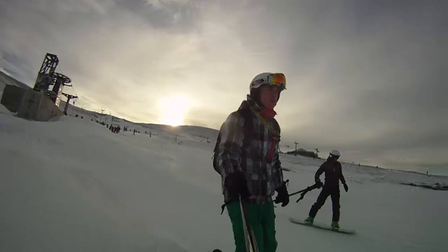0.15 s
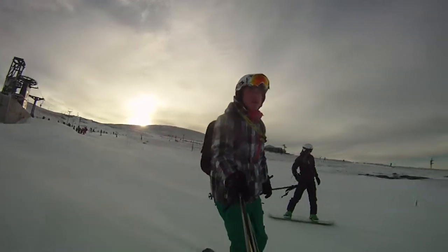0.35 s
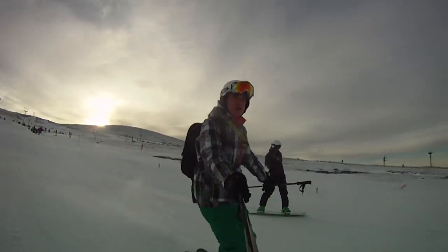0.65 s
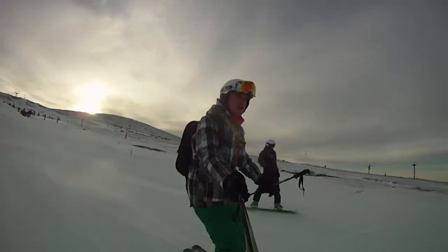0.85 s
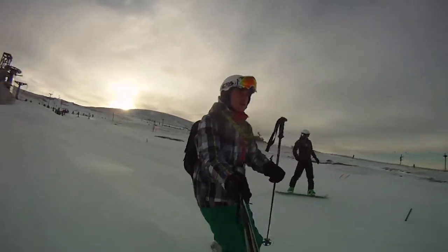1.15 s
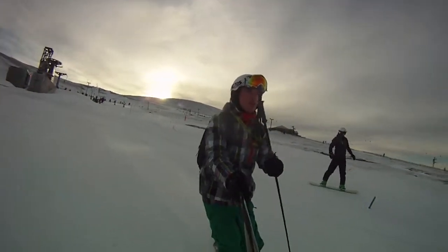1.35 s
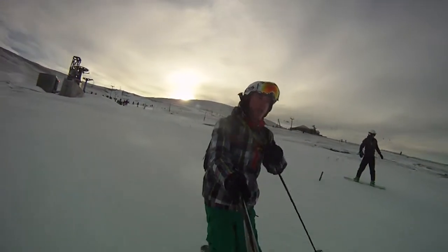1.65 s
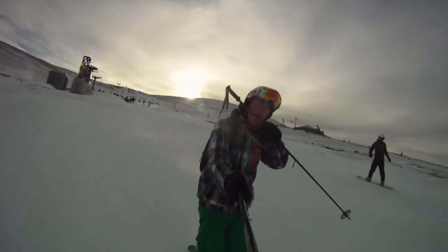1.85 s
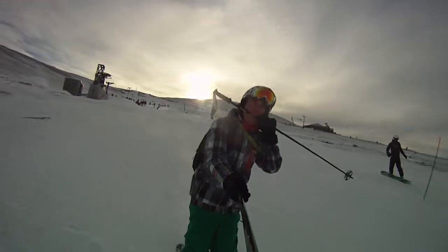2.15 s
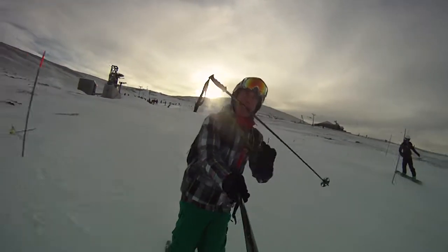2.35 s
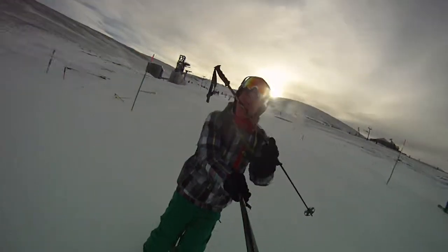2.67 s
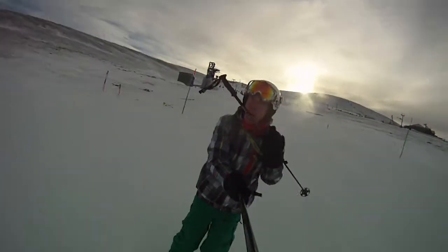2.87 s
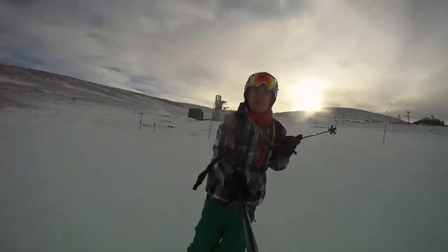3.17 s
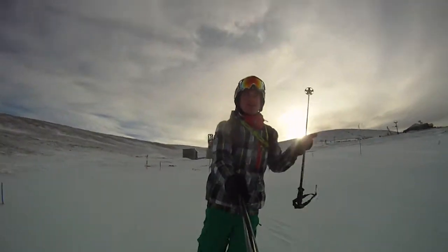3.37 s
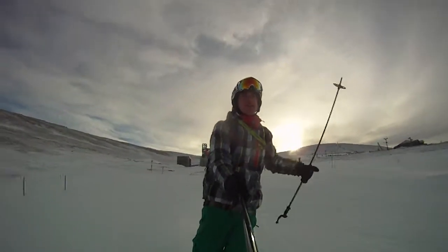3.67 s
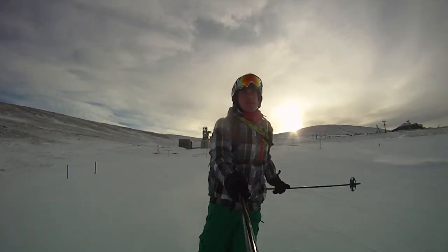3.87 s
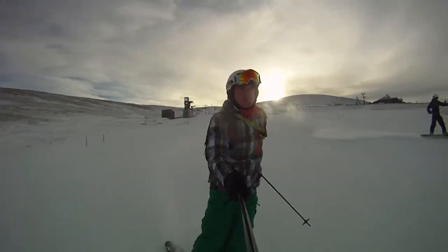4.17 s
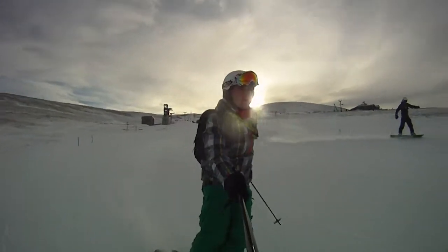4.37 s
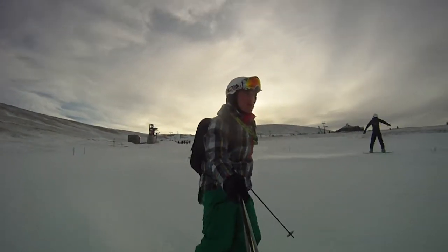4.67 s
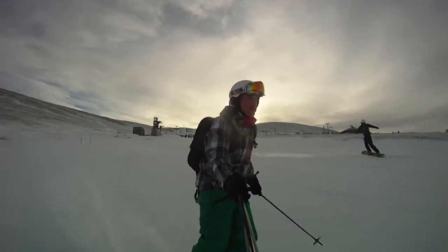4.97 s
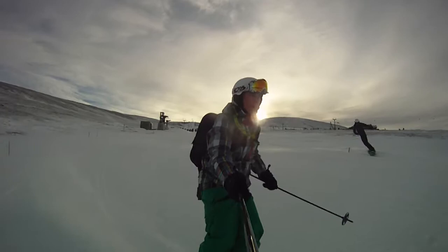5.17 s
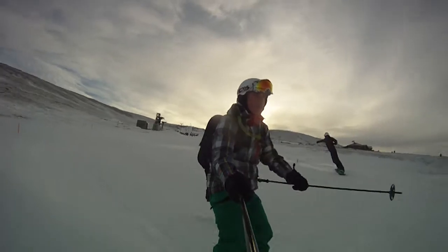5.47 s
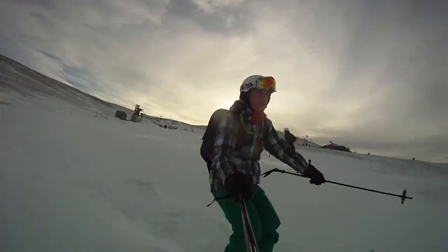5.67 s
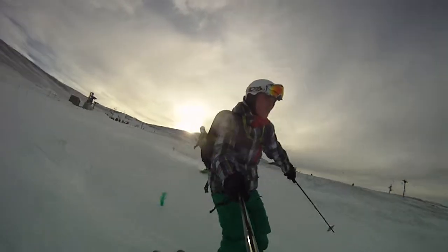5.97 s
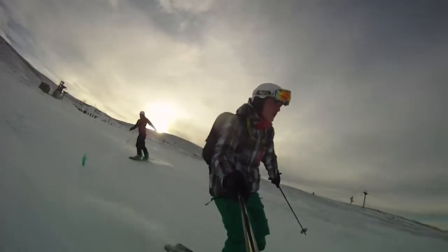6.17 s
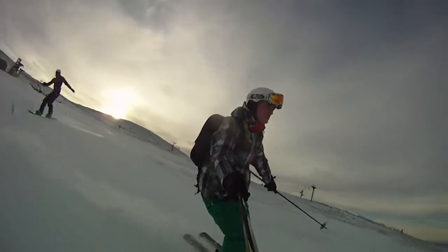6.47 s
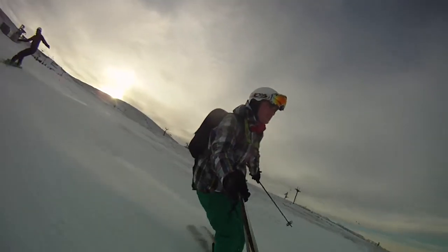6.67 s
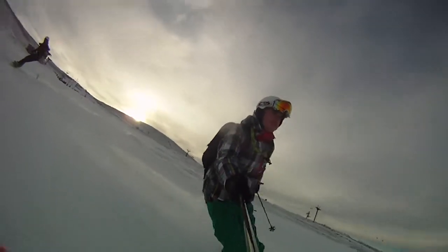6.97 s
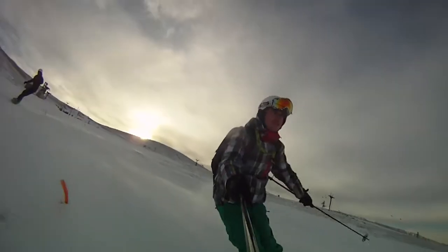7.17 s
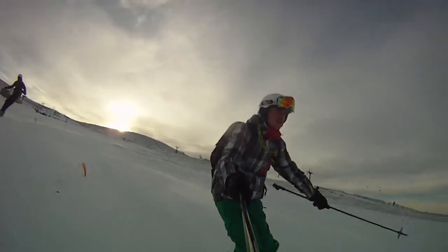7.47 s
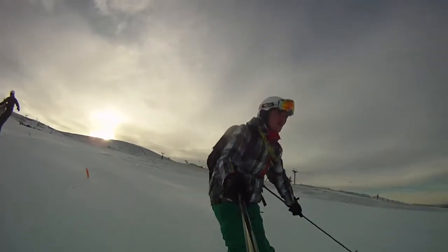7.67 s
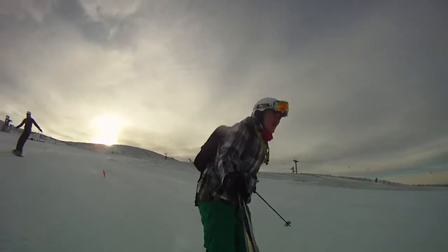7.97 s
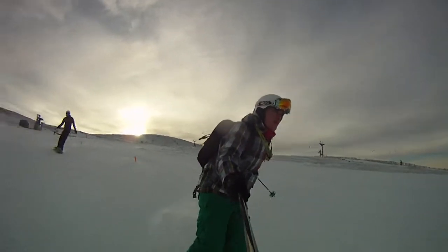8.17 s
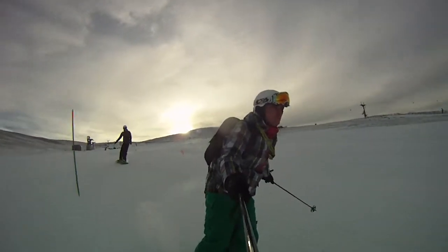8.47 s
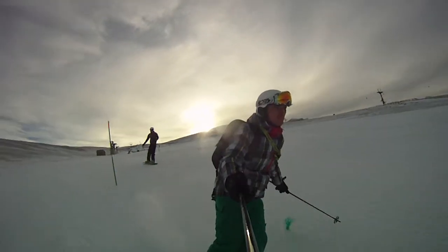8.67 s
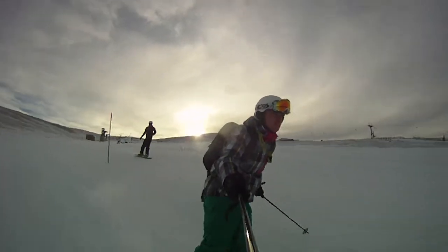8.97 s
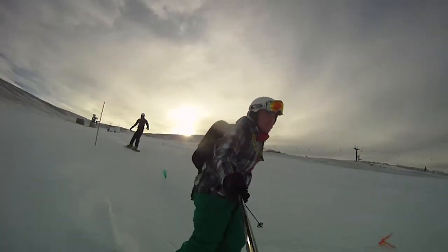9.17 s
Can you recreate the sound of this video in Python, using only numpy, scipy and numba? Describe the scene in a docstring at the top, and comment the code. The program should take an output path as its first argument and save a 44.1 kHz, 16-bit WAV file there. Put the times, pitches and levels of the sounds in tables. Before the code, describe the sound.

Outdoors on an open ski slope, heard from inside a closed camera case on a hand-held pole: boxy, close, dry, with gritty mirrored treble. From 0 s low wind throbs and hums over a thin, crunchy hiss of skis on packed snow. A click at 0.6 s leads to short rubbery creaks around 0.7-0.9 s, a deep thump and knocks near 1.1 s, then a quieter lull about 2 s. Thumps return around 2.5 s, with creaks and hollow wind hums at 3-3.4 s. The skis scrape harder at 4.3 s with sharp ticks. From 5 to 6.5 s the wind tone climbs and wavers loudly, with frequent chips clicking, then falls back. A scrape rises at 7.4 s, eases by 8 s, then the loudest grinding carve swells at 8.4-8.8 s and drops away, leaving a soft hiss, a faint creak and low wind until about 9.3 s.

```python
"""A skier glides and carves down packed snow, holding a camera in a closed housing on a pole.
From the start, snow grains under the skis ring the housing, and wind sheds tonal eddies, buffets and hums.
Chips and pole knocks tick from 0.6 s, stick-slip creaks the grip from 0.7 s, and gusts and knocks
give low thumps from 1.1 s. The eddy tone is highest from 5 to 6.5 s; the skis are loudest near 8.7 s.
Throughout, the recorder samples slowly and holds each value, which mirrors the sound into the treble."""
import sys
import numpy as np
from scipy import signal
from scipy.io import wavfile
from scipy.ndimage import uniform_filter1d
from numba import njit

SR = 44100
rng = np.random.default_rng(int(sys.argv[2]) if len(sys.argv) > 2 else 0)


def unload_audio(sound):
    """Save the sound as a 16-bit wav file, at the path given as the first command line argument."""
    columns = np.transpose(np.atleast_2d(sound))
    # keep every value between -1 and 1, then stretch to whole-number steps
    steps = np.round(np.clip(columns, -1, 1) * 32767)
    wavfile.write(sys.argv[1], SR, steps.astype(np.int16))


N = 411453  # samples


def undb(db):
    """Level definition: amplitude ratio = 10^(dB/20)."""
    return 10 ** (np.asarray(db) / 20)


def unit(x):
    """Normalisation to an RMS of 1."""
    return x / np.sqrt(np.mean(x ** 2))


def curves(table):
    """Linear interpolation in time of each column of a table."""
    s, *columns = np.transpose(table)
    return [np.interp(np.arange(N) / SR, s, c) for c in columns]


@njit
def svf(x, hz, width):
    """State-variable band-pass: a resonance with a moving centre, gain 1 at the centre."""
    y, band_state, low_state = np.empty(len(x)), 0., 0.
    for i in range(len(x)):
        g = np.tan(np.pi * hz[i] / SR)
        k = width[i] / hz[i]
        v = (band_state + g * (x[i] - low_state)) / (1 + g * (g + k))
        band_state = 2 * v - band_state
        low_state += 2 * g * v
        y[i] = k * v
    return y


def band(x, hz, width, skirt=1.84):
    """Cascaded resonance: two peaks of widths width and skirt * width, gain 1 at the centre."""
    peaks = [signal.iirpeak(hz, hz / w, fs=SR) for w in (width, skirt * width)]
    return signal.sosfilt([np.concatenate(peak) for peak in peaks], x)


def walk(rate):
    """Random modulation: normal levels joined by straight lines, rate of them a second."""
    steps = np.arange(N) * rate / SR
    levels = rng.standard_normal(int(2 * steps[-1]) + 9)
    return np.interp(steps, np.arange(len(levels)), levels)


def grains(rate, spread_db):
    """Shot noise: random clicks, rate a second on average, of scattered size."""
    size = rng.standard_normal(N) * undb(spread_db * rng.standard_normal(N))
    return unit(size * (rng.random(N) < rate / SR))


def swells(table, rise_s, fall_s):
    """Asymmetric Gaussian modulation: bell-shaped changes in dB with separate rise and fall times."""
    t = np.arange(N) / SR
    return sum(db * np.exp(-((t - s) / np.where(t < s, rise_s, fall_s)) ** 2) for s, db in table)


def blows(table, cycles, crack, crack_hz):
    """Impact response: a tone that dies within a few cycles, with a burst of noise around crack_hz."""
    tone, burst = np.zeros(N), np.zeros(N)
    for s, db, hz in table:
        turns = np.arange(int(6 * cycles * SR / hz)) * hz / SR
        push = undb(db) * (turns / cycles) * np.exp(1 - turns / cycles)
        i = int(s * SR)
        tone[i:i + len(turns)] += push * np.sin(2 * np.pi * turns)
        burst[i:i + len(turns)] += push
    noise = unit(band(rng.standard_normal(N), crack_hz, 0.84 * crack_hz))
    return tone + crack * burst * noise


# glide of the skis: [t/s, level/dB before the mode gains]
GLIDE = [(0, -48), (.4, -48.5), (.68, -48.5), (1.06, -44), (1.3, -50), (2.0, -52), (2.39, -49),
         (2.7, -51.5), (3.12, -52.5), (3.43, -46), (3.59, -45), (3.92, -44.5), (4.1, -41.5), (4.3, -36.5),
         (4.62, -43), (4.73, -40), (5.1, -38.5), (5.35, -37), (5.75, -50), (5.86, -44.5), (6.08, -47.5),
         (6.45, -43), (6.86, -43), (7.02, -46), (7.3, -44), (7.43, -38), (7.74, -44.5), (8.08, -50),
         (8.2, -40), (8.4, -32), (8.68, -29.5), (8.9, -35.5), (8.94, -44.5), (9.2, -45), (9.33, -49)]
# spectral colour of the skis: [t/s, then five gains/dB: 1 near 1.1 kHz, 2 near 1.3 and 2.9 kHz,
# 3 near 3.6 kHz, 4 above 4 kHz, 5 under 1 kHz and near 1.6 kHz]
SKI_COLOUR = [(0, -6.5, -4, -4.5, -1, -14.5), (.45, -6.5, -5, -1.5, 0, -13), (1.0, -7, -7, -7, -5, -10.5),
              (1.45, -1.5, -5, -2, -2.5, -10), (1.9, -7.5, -5, -3, -3.5, -16),
              (2.35, -4.5, -8, -1.5, -6.5, -15), (2.75, -2.5, 1, -1, -3.5, -11),
              (3.1, -4.5, -6, -4, -4, -13), (3.55, -6, -4.5, -1.5, -4.5, -20.5), (4.02, 0, -4, -4, -6, -14),
              (4.35, -8, -4, -5, -7.5, -19), (4.65, -8.5, -2, -4.5, -5, -19), (4.95, -5.5, -1, -3, -3, -18),
              (5.3, -6.5, -4, -4, -6.5, -20.5), (5.75, -7, -3, -5, -4.5, -13), (6.0, -9, -5, -5, -4.5, -15),
              (6.32, -9, -4, -5, -3, -13), (6.5, -3, -3, -2.5, 2, -9.5), (6.9, -11, -4, -4.5, -6, -14),
              (7.28, -3, -11, -5, -12, -18), (7.45, -3.5, -8, -6.5, -10, -10.5),
              (7.8, -7, -6, -0.5, -5.5, -16), (8.3, -1.5, -2, -3, -4.5, -17), (8.55, -3, -3, -3, -5.5, -17),
              (8.85, -6.5, -3, -4, -7.5, -25), (9.1, -7.5, -1, -3, -3.5, -19),
              (9.33, -6, -1, -2, -2, -16.5)]
# modes of the housing: [f/Hz, width/Hz, gain/dB, colour number: rounded, halves to even; 0 none, -1 last]
HOUSING_MODES = [(443, 340, 9.3, 5), (752, 244, 16.4, 5), (1045, 203, 12.8, 1), (1182, 90, 22.04, 1),
                 (1321, 71, 14.4, 1.5), (1620, 220, 6, -1), (1930, 304, 12.9, 0), (2190, 300, 16.7, 0),
                 (2446, 320, 13.8, 0.5), (2944, 550, 16.1, 1.5), (3600, 240, 18, 3), (4293, 340, 15, 4),
                 (4606, 120, 9.9, 4), (5010, 92, 15, 4), (5400, 300, 19, 4)]


def skis():
    """Modal excitation: patchy hiss and crunching grains of crushed snow ring the housing's resonances."""
    (glide_db,) = curves(GLIDE)
    # chance shifts in colour: 1.5 dB spread, 14 a second
    colour = [1, *(undb(db + 1.5 * walk(14.)) for db in curves(SKI_COLOUR))]
    patchy = undb(0.07 * walk(5.2) + 0.66 * walk(40.) + 1.4 * walk(150.))
    # two independent snow noises ring alternate modes, so neighbouring modes do not cancel
    snow = []
    for _ in range(2):
        crushed = rng.standard_normal(N) + 0.33 * grains(rate=1500., spread_db=5.0)
        snow.append(unit(patchy * crushed))
    rings = np.zeros(N)
    for i, (hz, width, db, number) in enumerate(HOUSING_MODES):
        # each mode's level also flickers at random, on its own
        gain = colour[round(number)] * undb(db + 0.96 * walk(11.))
        rings += gain * band(snow[i % 2], hz, width)
    return rings * undb(glide_db)


# wind on the housing: [t/s, shedding f/Hz, shedding level/dB, buffeting level/dB]
WIND_COURSE = [(0.0, 67.8, -35.5, -46), (0.2, 66.6, -36, -37.5), (0.6, 50.5, -35, -38),
               (1.15, 49.06, -37, -31), (1.5, 53.8, -46, -41.5), (1.9, 52, -50, -45),
               (2.45, 53, -41.5, -36), (3.3, 53.96, -43, -39), (4.1, 49.4, -44.5, -40),
               (4.42, 69, -37, -35), (4.8, 83, -32.5, -35.5), (5.03, 100.1, -25.5, -37),
               (5.3, 107, -29, -39), (5.56, 97, -26.5, -37), (5.78, 112, -25, -38), (6.05, 114.6, -27, -35),
               (6.25, 110, -38, -33), (6.5, 106.4, -35, -30.5), (6.6, 61.42, -39.5, -31),
               (7.12, 53, -37.5, -37), (7.5, 53.2, -48, -47.5), (8.3, 56.1, -43.5, -41),
               (8.8, 50.8, -44, -41), (9.33, 52, -42.5, -45.5)]
# brief swells and dips of the shedding: [t/s, change of level/dB]
SHEDDING_SWELLS = [(.02, 7), (.6, 1), (.76, -6), (.85, 3), (3.18, 12.5), (3.35, 9), (4.3, -6), (5.16, -11),
                   (5.26, 8.5), (5.48, 4.5), (5.67, -5), (5.75, 6), (6.14, -11), (6.23, 7), (6.32, -6),
                   (6.41, 5)]
# brief swells and dips of the hollow hum: [t/s, change of level/dB]
HOLLOW_SWELLS = [(.88, 9), (1.1, 16), (3.05, 11), (3.14, 14), (3.32, 18.5), (4.42, 6), (4.61, 13),
                 (4.89, 15), (4.97, 5), (5.09, 8), (5.28, 10), (5.38, 8), (5.44, 8), (5.6, 17), (6.03, 9),
                 (6.17, -8), (6.3, -10), (6.47, 4), (9.04, 9)]


def wind():
    """Vortex shedding: eddy pitch follows the air speed, over slow buffeting; a resonant hollow hums along."""
    hz, shed_db, buffet_db = curves(WIND_COURSE)
    shed_db = shed_db + swells(SHEDDING_SWELLS, rise_s=.03, fall_s=0.051) + 1.8 * walk(9.7)

    eddies = rng.standard_normal(N) / np.sqrt(hz)
    for share in (.2, .4, .6):  # bandwidth as a share of the pitch
        eddies = svf(eddies, hz, share * hz)
    # part of the shedding locks into a wavering tone
    locked = np.sin(2 * np.pi * np.cumsum(hz * (1 + 0.0604 * walk(25.))) / SR)
    eddies = unit(unit(eddies) + 2.03 * locked)
    buffet = unit(band(rng.standard_normal(N), 24.4, 19.3))

    # the hum grows with the air speed, 18 dB an octave of shedding pitch
    hollow_db = -60.5 + 18 * np.log2(hz / 55)
    hollow_db = hollow_db + swells(HOLLOW_SWELLS, rise_s=0.054, fall_s=0.066) + 1.2 * walk(23.0)
    air = rng.standard_normal(N)
    # the low mode gains on the high one as the shedding pitch rises
    low_mode = (hz / 128) ** 1.7 * band(air, 122.7, 18.7)
    high_mode = undb(-17.5) * band(air, 182.7, 35)
    hollow = band(low_mode + high_mode, 147.0, 92, skirt=1.0)
    hollow = hollow / np.sqrt(uniform_filter1d(hollow ** 2, size=SR))  # level over one second

    # low murmur of air through the housing
    murmur = unit(band(rng.standard_normal(N), 270, 690))
    out = eddies * undb(shed_db) + buffet * undb(buffet_db + 1.5 * walk(7.8))
    return out + hollow * undb(hollow_db) + murmur * undb(-66 + 0.5 * walk(3.9))


# ice chips and pole knocks: [t/s, peak level of the envelope/dB, f/Hz]
CHIPS_AND_KNOCKS = [(.58, -29, 5370), (.974, -36, 1168), (1.194, -29.5, 2000), (1.196, -36, 1200),
                    (1.217, -33, 2100), (2.517, -35.5, 1310), (2.542, -32.5, 1196), (3.185, -48, 2230),
                    (3.456, -33.5, 2230), (4.229, -25, 2093), (4.324, -27, 1193), (4.365, -23.5, 2850),
                    (5.059, -26.5, 2283), (5.232, -25.5, 2060), (5.309, -27.5, 1162), (5.373, -23.5, 2235),
                    (5.808, -38, 2485), (5.845, -34, 2109), (5.891, -33, 2131), (6.089, -45, 2413),
                    (6.233, -33, 5464), (6.326, -33, 2120), (6.399, -29.5, 2100), (6.543, -24, 5350),
                    (6.71, -26, 5470), (6.886, -31, 4600), (7.59, -27.5, 2100), (8.194, -25, 2173),
                    (8.905, -28, 1190)]


def ticks():
    """Impact response: ice chips and pole knocks excite short damped tones with noisy cracks."""
    return blows(CHIPS_AND_KNOCKS, cycles=2.65, crack=0.32, crack_hz=2830.0)


# creaks of the grip: [start t/s, length/s, level/dB]
CREAK_TIMES = [(0.716, 0.055, -41), (0.763, 0.16, -41.5), (1.301, 0.066, -49), (1.386, 0.028, -46),
               (2.298, 0.17, -47), (2.946, 0.048, -43.5), (3.002, 0.017, -41), (3.019, 0.049, -41),
               (3.107, 0.013, -41), (3.12, 0.06, -42), (3.296, 0.033, -47), (9.017, 0.14, -44.5)]
# modes of the pole's tube: [f/Hz, width/Hz, relative level/dB]
TUBE_MODES = [(1852, 120, 7), (2044, 59, 2), (1455, 270, -2), (1010, 180, -7.5)]


def grip():
    """Stick-slip friction: clicks of the glove on the pole ring the modes of its tube."""
    t = np.arange(N) / SR
    effort = np.zeros(N)
    for s, length, db in CREAK_TIMES:
        arch = np.sqrt(np.clip(1 - (2 * (t - s) / length - 1) ** 2, 0, 1))
        effort += undb(db) * arch
    slips = grains(rate=1300.0, spread_db=3.5)
    return effort * unit(sum(undb(db) * band(slips, hz, width) for hz, width, db in TUBE_MODES))


# low thumps of gusts and pole knocks: [t/s, peak level of the envelope/dB, f/Hz]
LOW_THUMPS = [(1.055, -24, 45.8), (1.092, -32, 90), (1.194, -34, 111), (1.399, -37, 100),
              (2.499, -27, 37.8), (2.594, -22, 45.8), (3.152, -26, 35.65), (3.312, -22.5, 30.8),
              (3.35, -21.5, 53.9), (3.75, -32, 38.6), (4.2, -27, 27.4), (6.951, -28.5, 37.7),
              (8.279, -31.5, 27.56)]


def thumps():
    """Impulsive loading: gusts and knocks push the housing into heavily damped low tones."""
    return blows(LOW_THUMPS, cycles=0.48, crack=0.0061, crack_hz=166.2)


def scene():
    """Superposition: the pressures of all sources add."""
    return (skis() + wind() + ticks() + grip() + thumps())[None]


def record(dry):
    """Sample-and-hold imaging: slow samples, each repeated, mirror the sound about multiples of 6 kHz."""
    held_rate, repeats, top_hz = 12000, 4, 15290  # samples/s, copies of each, upper cut-off/Hz
    x = signal.sosfilt(signal.butter(2, 18, "high", fs=SR, output="sos"), dry)
    x = signal.sosfilt(signal.butter(8, 5580, fs=SR, output="sos"), x)
    fast = held_rate * repeats
    slow = signal.resample_poly(x, fast, SR, axis=1)[:, ::repeats]
    held = signal.resample_poly(np.repeat(slow, repeats, axis=1), SR, fast, axis=1)
    held = np.pad(held, ((0, 0), (0, 8)))[:, :N]  # exactly N samples
    return signal.sosfilt(signal.ellip(12, .2, 70, top_hz, fs=SR, output="sos"), held)


dry = scene()
out = record(dry)
unload_audio(out)
```